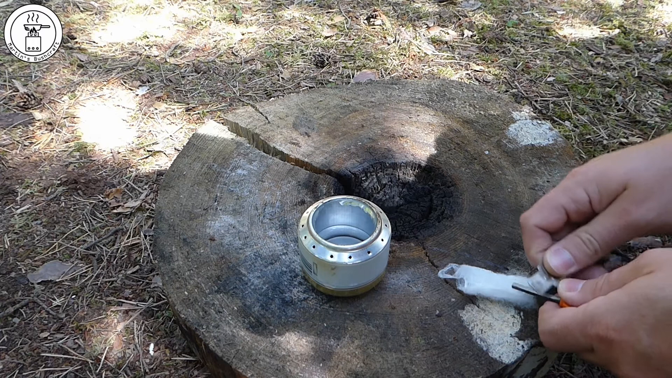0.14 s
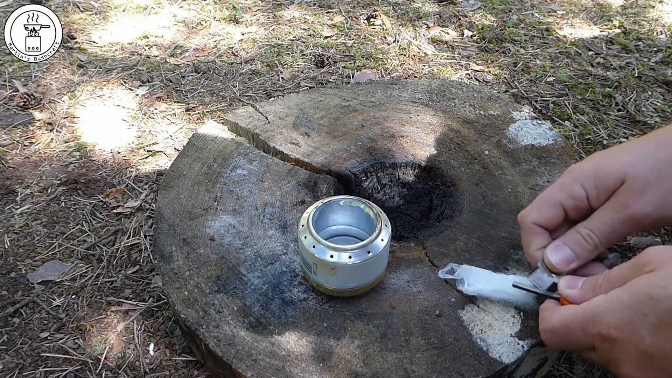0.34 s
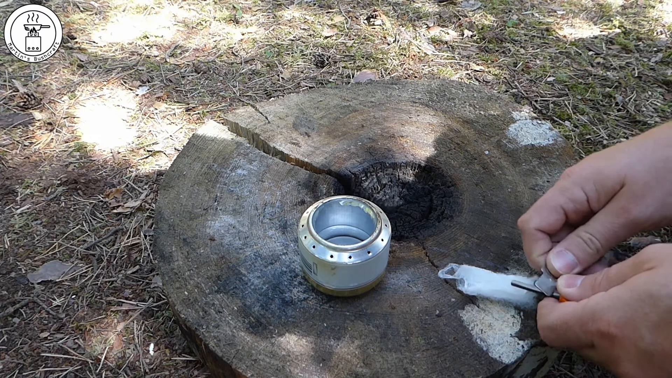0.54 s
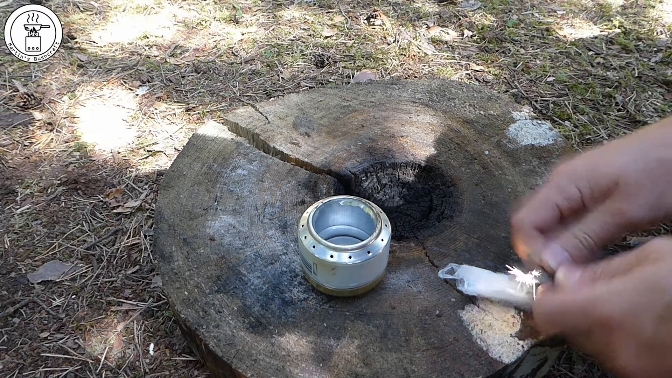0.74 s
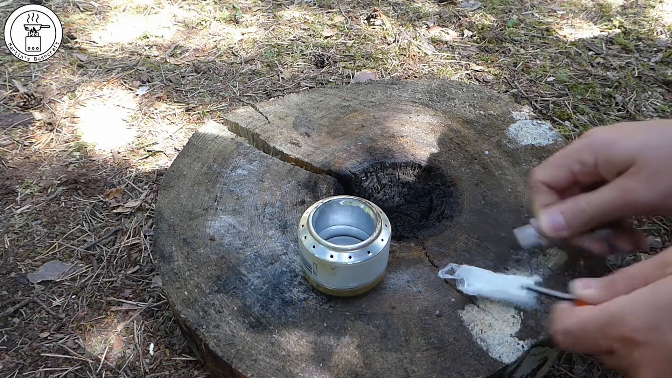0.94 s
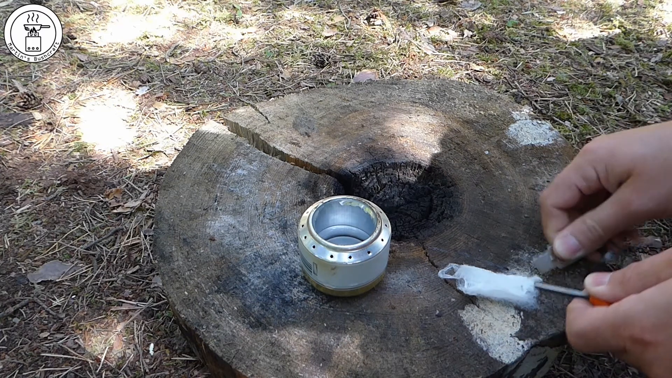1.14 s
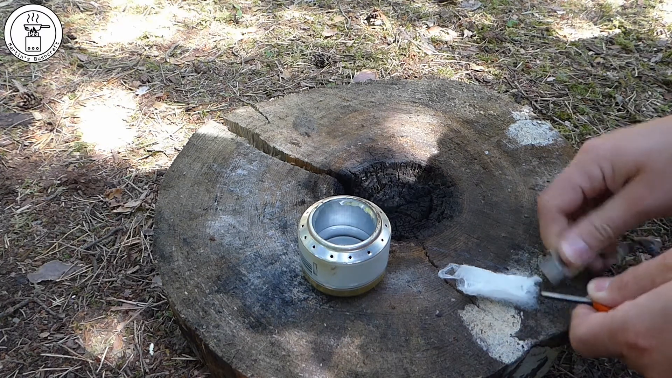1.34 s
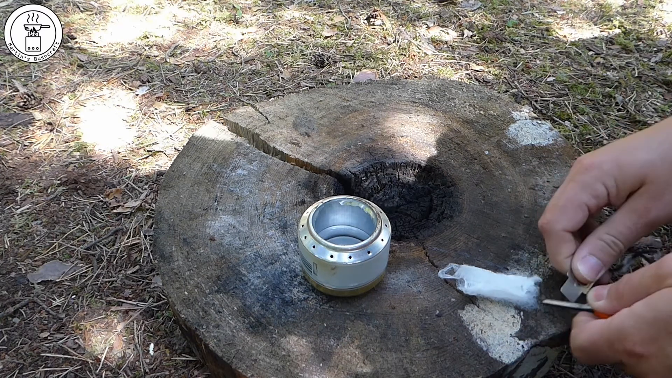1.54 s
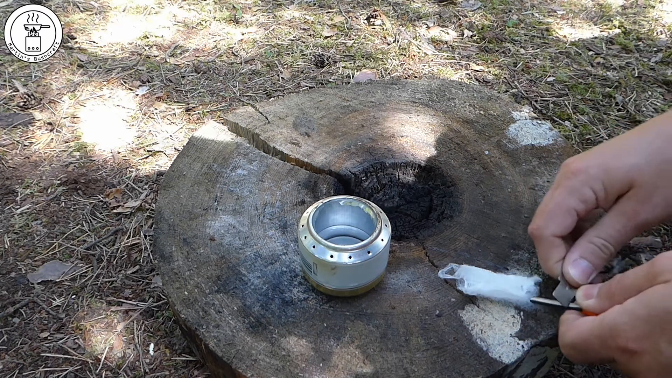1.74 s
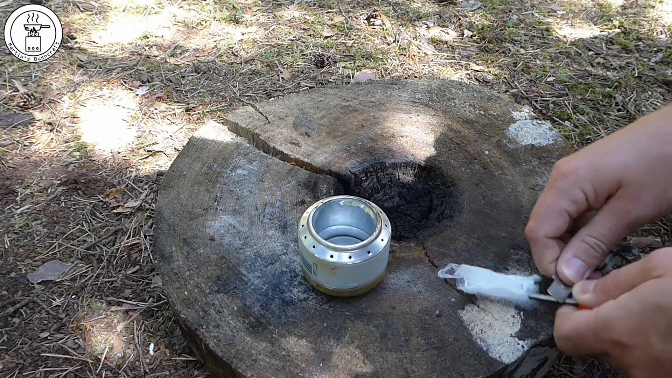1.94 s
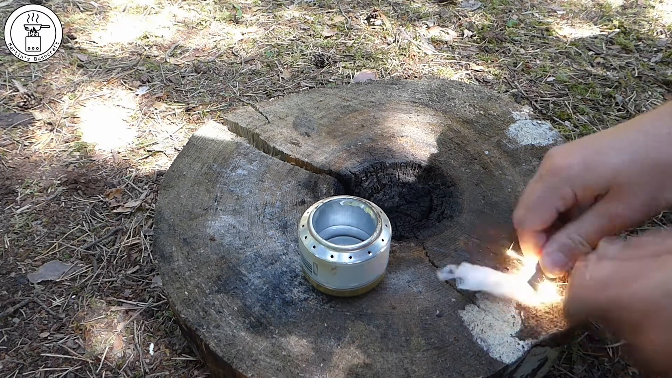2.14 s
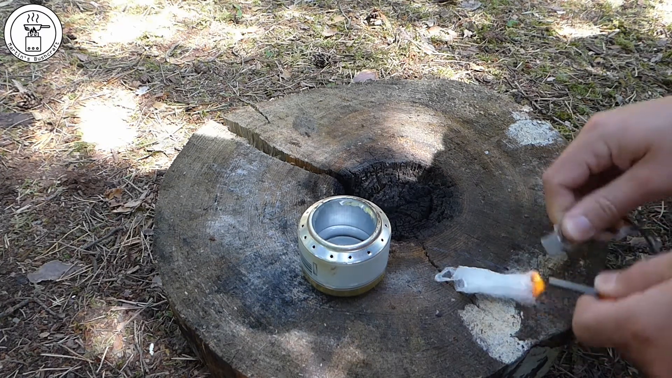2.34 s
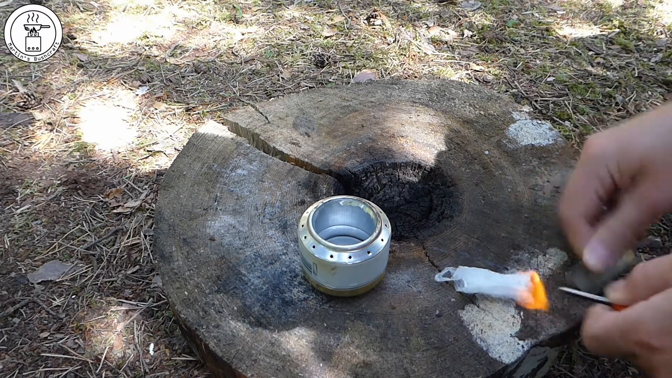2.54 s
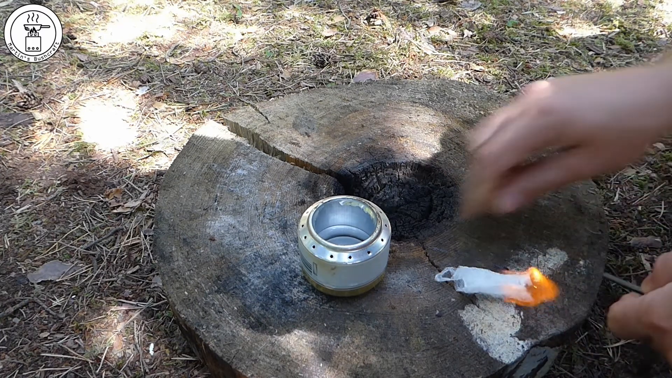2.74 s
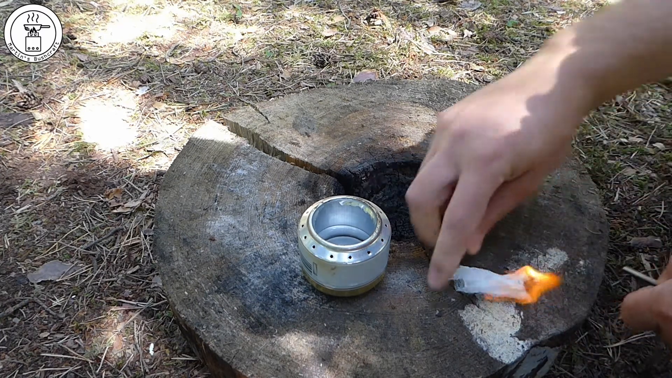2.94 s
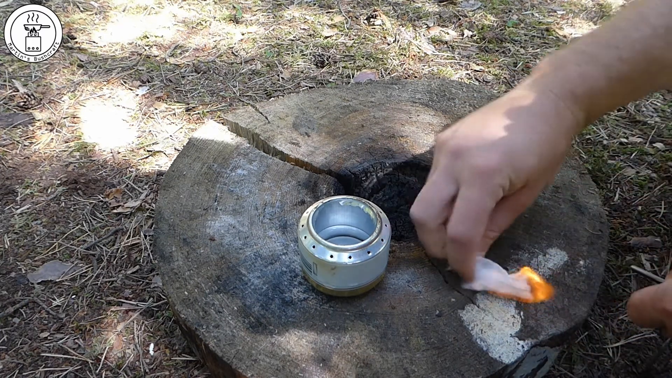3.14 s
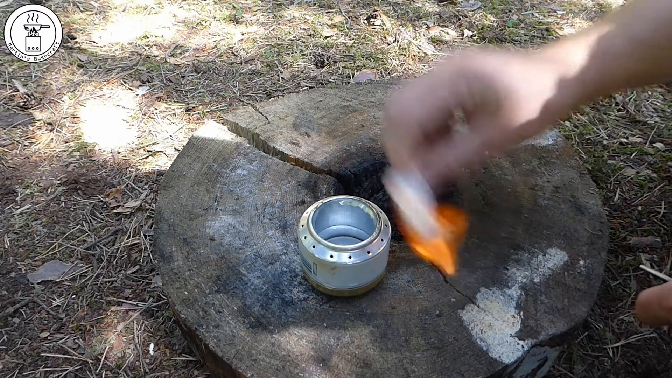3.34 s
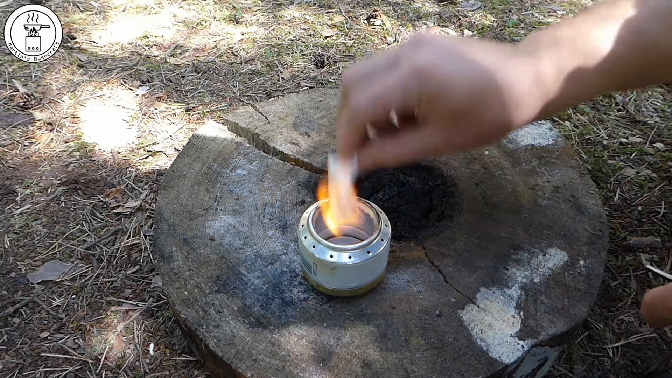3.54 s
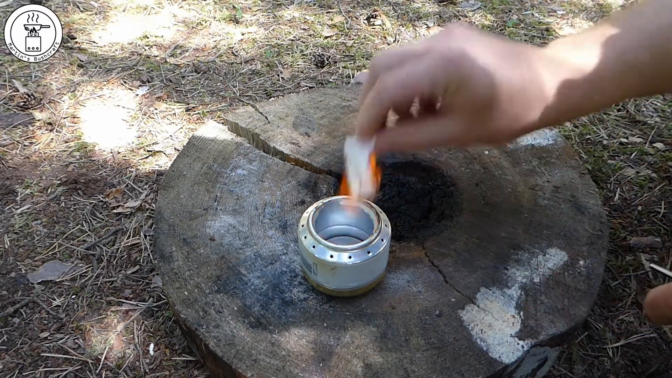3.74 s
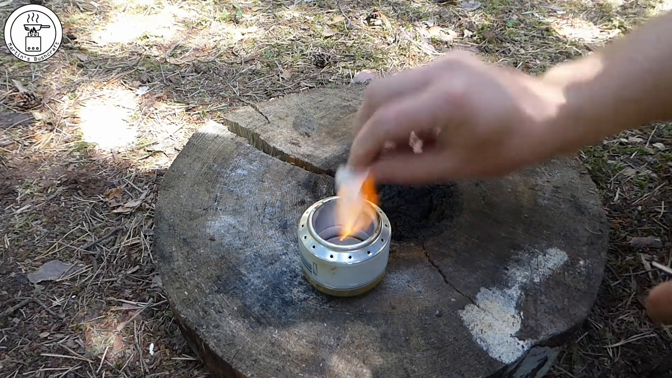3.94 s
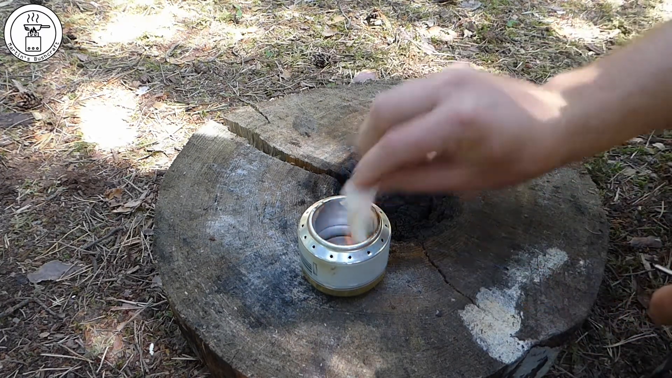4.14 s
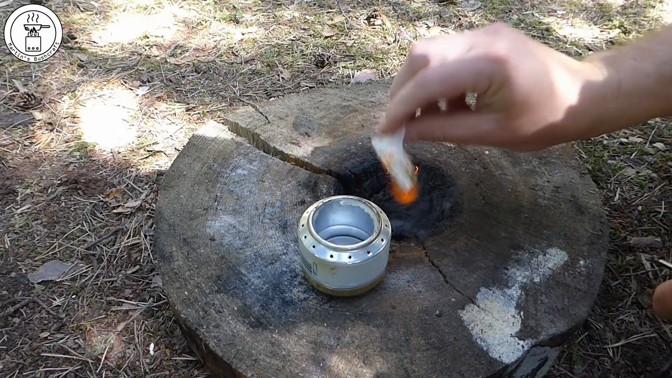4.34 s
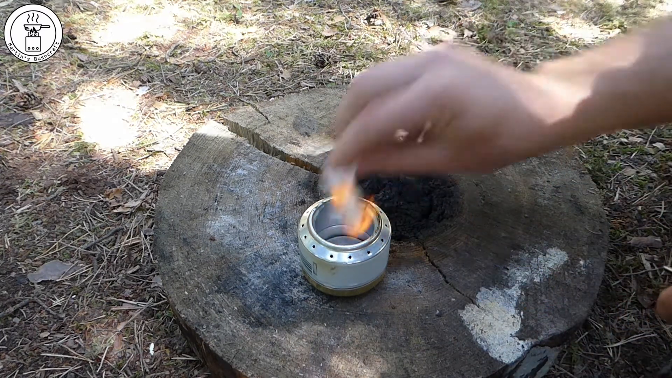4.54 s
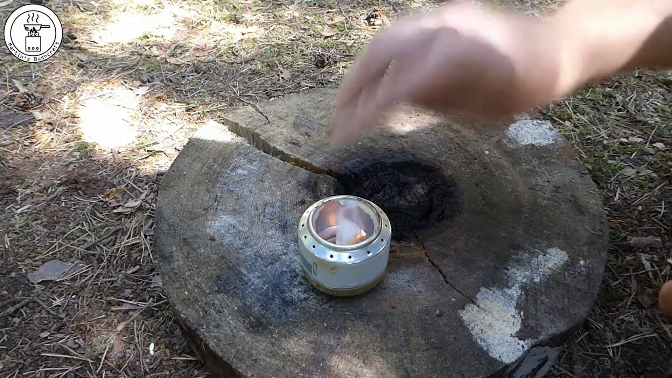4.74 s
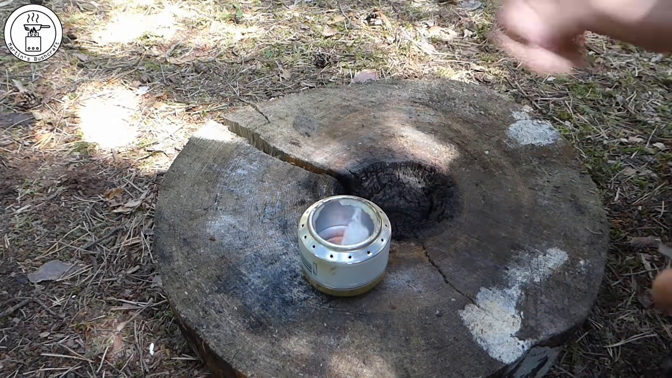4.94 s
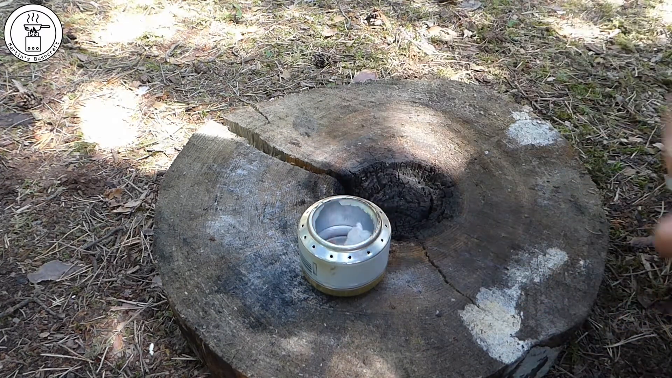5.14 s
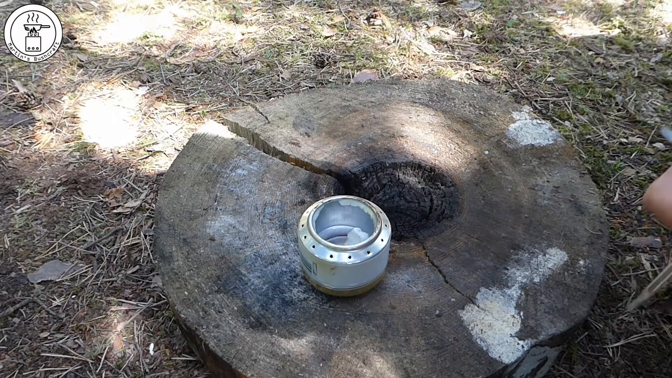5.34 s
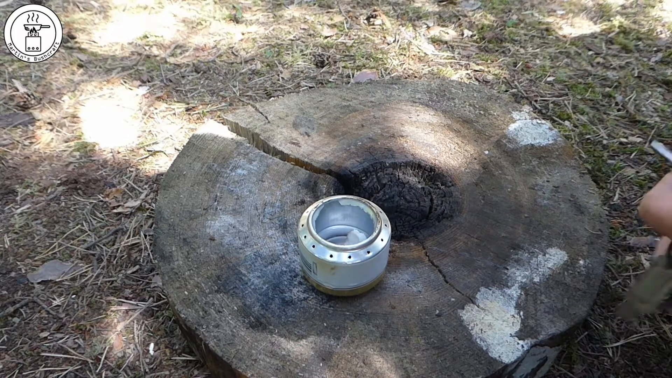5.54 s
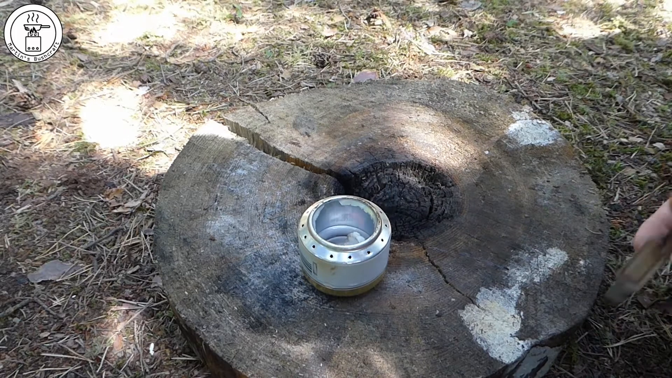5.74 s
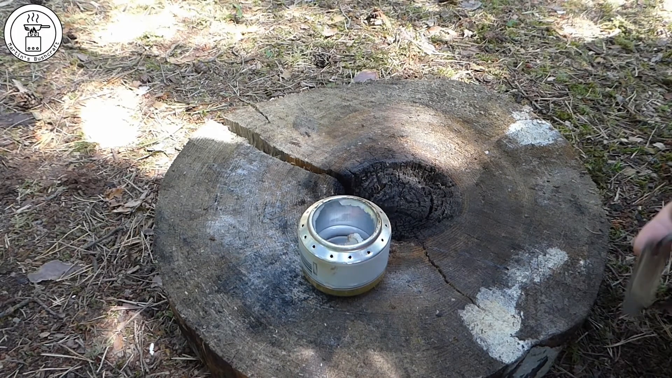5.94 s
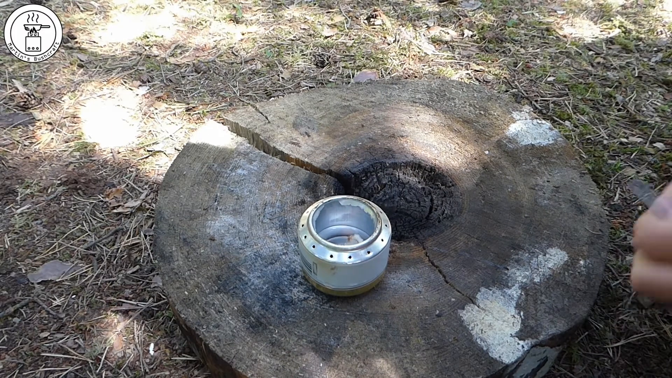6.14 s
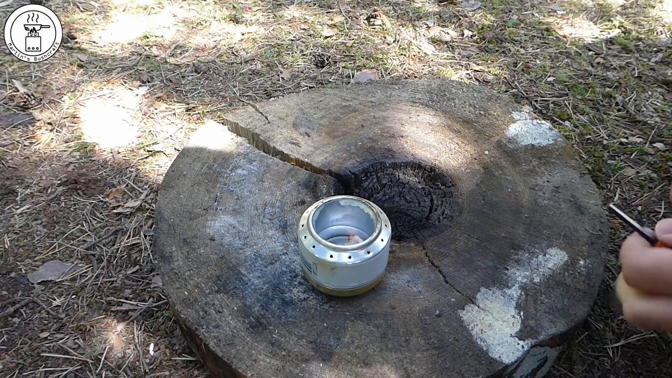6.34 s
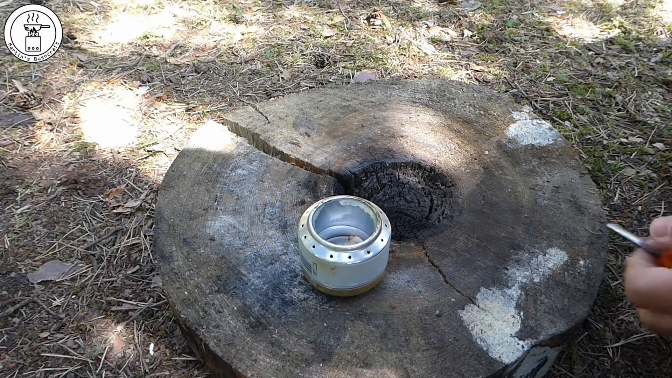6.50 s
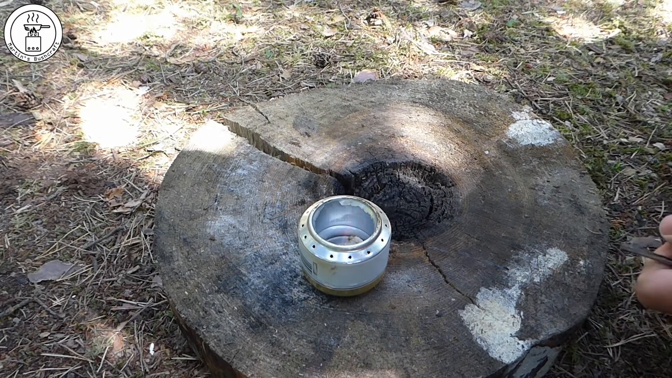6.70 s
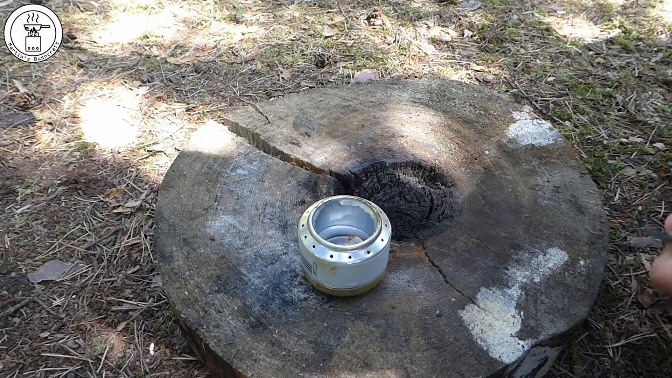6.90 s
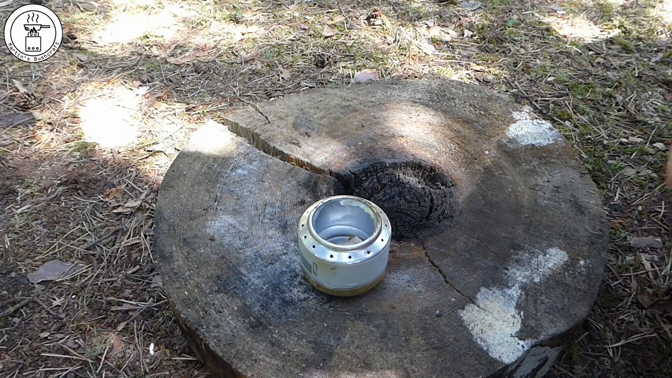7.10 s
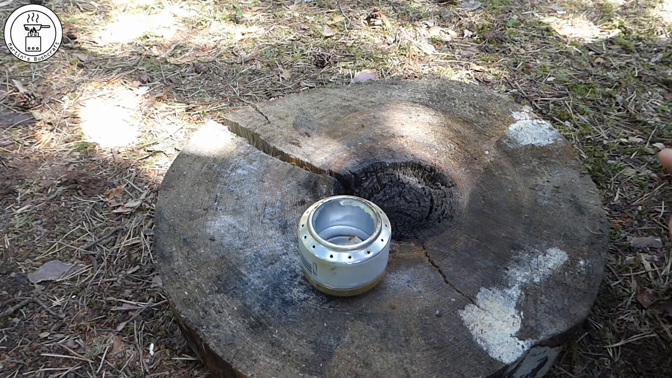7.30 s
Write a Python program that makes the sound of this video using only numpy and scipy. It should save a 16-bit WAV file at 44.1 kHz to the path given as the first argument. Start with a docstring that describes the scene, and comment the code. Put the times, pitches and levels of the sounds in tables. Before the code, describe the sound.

A fire steel is struck twice outdoors, the scraper drops on wood, and a small stove lights with a pop and brief sizzle.

```python
"""Lighting a spirit stove with a fire steel

A steel scraper tears twice down a ferrocerium rod, shaking the tree stump below; sparks fizz and light
a wad of tinder. The scraper drops on the wood and rings, and hands rustle the wad over to a small spirit
stove. The vapour catches with a pop, sizzles, and settles into a fading hollow hiss. Small clinks, a
squeak and a bump follow. Light wind murmurs in the trees throughout."""
import sys
import numpy as np
from scipy import signal
from scipy.fft import rfft, irfft, next_fast_len
from scipy.io import wavfile
from scipy.ndimage import uniform_filter1d, map_coordinates

SR = 44100
rng = np.random.default_rng(int(sys.argv[2]) if len(sys.argv) > 2 else 0)


def pcm_store(signal):
    """Save signal as 16-bit PCM."""
    levels = np.round(np.clip(np.atleast_2d(signal), -1, 1) * 32767)
    wavfile.write(sys.argv[1], SR, levels.astype(np.int16).T)


N = 324742

# strokes down the rod: start_s, release_s, release_level_db, body_gain_db, spark_level_db
ROD_STROKES = [(0.806, 0.8364, -25, -3.5, -61), (2.145, 2.193, -24.5, -9.5, -56.5)]
# the edge grazes the rod as it first catches or on the rebound: start_s, level_db
ROD_GRAZES = [(.8125, -31.5), (2.233, -34), (2.248, -35)]
# bright metal friction: freq_hz, level_db
SCRAPE_SPECTRUM = [(100, -27.5), (500, -6), (1200, -21.5), (1700, -10.5), (2500, -8.5), (4000, -6),
                   (5500, -9), (6400, -3), (8000, -9), (10400, 2), (12500, -0.5), (14000, -19),
                   (15500, -29)]
# resonances of rod and edge: centre_hz, width_hz, lift_db
ROD_RESONANCES = [(2550, 280, 6), (6380, 700, 3.5), (10000, 1470, 0.5)]
# the shudder of rod and stump: freq_hz, level_db
SHUDDER_SPECTRUM = [(40, -36), (70, -25), (140, -5.5), (230, -3.5), (360, 1), (520, -5), (900, -7),
                    (1500, -12), (4000, -49)]
# the edge snaps off the rod or taps it: start_s, ring_db, focus_hz, falloff_db_per_octave, crack_db
EDGE_SNAPS = [(0.4794, -33.5, 7000, 9, -45), (0.8368, -2, 8800, 8.5, -15),
              (0.8379, -10.5, 10400, 11.5, -20), (1.708, -16.5, 5000, 32, -41.5),
              (2.19, -4.5, 12360, 7.5, -13), (2.3696, -36, 4500, 13, -37)]
# modes of rod and edge, damped by the fingers: pitch_hz, level_db, t60_s
HELD_MODES = [(2560, 1, .007), (3130, 0.5, 0.0043), (4200, -7.5, 0.0068), (5850, -5.5, .005),
              (6850, -5.5, .006), (9450, 2, 0.0046), (10320, -2.5, 0.0065), (12320, -5, 0.0051)]
# the scraper lands, and later clinks as it is picked up: start_s, ring_db, knock_db, tilt_db_per_octave
SCRAPER_HITS = [(2.63, -47, -37.5, -3), (2.6593, -41, -37.5, 2.5), (2.673, -49.5, -62.5, -.5),
                (2.772, -68, -47, 5), (5.79, -81, -74, 1), (5.95, -81, -74, 4), (6.02, -79, -68, 6),
                (6.275, -73, -76, 1), (6.315, -73, -80, 2)]
# modes of the loose scraper: pitch_hz, level_db, t60_s
SCRAPER_MODES = [(812, 0.5, 0.12), (1766, -0.5, 0.1), (4406, -11, 0.41), (4420, -7, 0.43), (8450, -21, .3),
                 (10220, -6, 0.33), (12900, 10, 0.078), (12905, -11.5, 0.4), (14300, -27, .25)]
# a knock on the stump: freq_hz, level_db
KNOCK_SPECTRUM = [(40, -35), (120, 3), (300, -2), (800, 6), (1500, -7.5), (3000, -13), (7000, -19),
                  (15000, -21)]
# the vapour catches: start_s, level_db
VAPOUR_PUFFS = [(4.7437, -29), (4.7484, -17.5)]
# damped air modes of the pop: pitch_hz, level_db, t60_s
POP_MODES = [(215, -7, 0.018), (364, -3, 0.016), (706, -2, 0.0086), (1950, -12.5, 0.0093)]
# spirit sizzling on the hot wad: freq_hz, level_db
SIZZLE_SPECTRUM = [(710, -43), (1200, 0), (1470, -7), (1800, -1), (1960, 1), (2740, 0.5), (4720, -11),
                   (6730, 1.5), (8330, -3.5), (10800, 4), (12400, -1), (14900, -21), (15500, -30.5)]
# resonances of the burning stove: centre_hz, width_hz, level_db
JET_RESONANCES = [(2395, 490, -1.5), (3644, 1700, -2.5), (6700, 720, -2), (10600, 1300, -10.5)]
# the settling flame spits: peak_s, level_db
FLAME_SPITS = [(5.645, -56.5), (5.86, -63.5), (5.925, -61.5), (6.25, -63.5)]
# fizzing tinder fibres: freq_hz, level_db
FIZZ_SPECTRUM = [(880, -32), (1500, -4), (1840, -3.5), (2020, -3), (2730, -8), (3000, -3.5), (4210, -3.5),
                 (5510, -9.5), (10700, -4.5), (15000, -22)]
# hands and wad rustle, rising and falling by 20 dB: peak_s, level_db, rise_s, fall_s
HAND_RUSTLES = [(2.79, -54.5, 0.33, 0.2), (3.03, -63, 0.089, .1), (3.15, -62, .06, 0.074),
                (3.36, -58.5, 0.3, 0.17), (3.52, -63, 0.14, 0.16), (7.34, -57.5, 0.28, .3)]
# soft bumps of hand and tool: start_s, level_db, pitch_hz, t60_s
HAND_BUMPS = [(2.7748, -39, 245, 0.037), (6.793, -32, 242, 0.022)]
# the glide of the squeak: time_s, pitch_hz
SQUEAK_GLIDE = [(6.59, 8650), (6.68, 9450), (6.72, 9350), (6.76, 9700), (6.82, 8450)]
# the rasp in the squeak: freq_hz, level_db
RASP_SPECTRUM = [(800, -25), (2000, 1), (3500, -4.5), (6000, -8), (8000, -16), (15000, -38.5)]
# wind in distant trees: freq_hz, level_db
TREE_SPECTRUM = [(15, -72.5), (25, -32), (59, -23.5), (72, -15), (95, -5), (188, 0), (238, -6), (303, -5.5),
                 (384, -4.5), (479, -7.5), (771, -5.5), (1030, -11), (1200, -13), (1580, -19.5),
                 (2000, -29), (2600, -53), (4400, -120)]
# faint airy hiss: freq_hz, level_db
AIR_SPECTRUM = [(1180, -34), (2000, -0.5), (2140, -3.5), (2370, -5), (2630, -5), (3260, -2.5), (4180, -3.5),
                (4590, -2.5), (5740, -10), (6250, -3), (7680, -10), (10100, -5.5), (11400, -7),
                (14700, -18), (15500, -28)]
# how alike the wind is left and right, negatives counting as zero: freq_hz, likeness
STEREO_LIKENESS = [(60, 0.88), (120, 1), (240, 0.93), (480, 0.76), (950, 0.4), (1890, -1.34), (3770, 0.21),
                   (7520, 0.36), (15000, 0.39)]
# the tail from ground and trunks: freq_hz, t60_s
WOODS_DECAY = [(200, .25), (2000, .3), (10000, 0.22)]

GATHER_DB, SHUDDER_DB_PER_S = 18, 296.5  # a stroke builds; the stump shakes more as the hand bears down
FOLLOW_DB, FOLLOW_HOLD_S, FOLLOW_T60_S = -6, .0081, .04  # the follow-through after the release
GRAZE_HOLD_S, GRAZE_T60_S, GRAZE_BODY_DB = .0023, .018, -8.5
SLIDE_HZ = 8000  # without pressure the edge slides, and is duller above this
CRACK_T60_S, SNAP_ATTACK_S = .008, .00018
RING_ATTACK_S, KNOCK_T60_S = .0004, .04
REST_S, REST_T60_S = 2.77, .1  # once the scraper lies flat, the wood damps it
TINDER_LIT_S, IGNITION_S, JET_FULL_S, FLARE_S = 2.4, 4.735, 5.063, 5.07
JET_START_RATIO, JET_END_RATIO, JET_SETTLE_S = 1.08, .93, .8  # the stove's resonances sink in pitch
TREES_DB, AIR_DB = -53, -65.5
LOW_CUT_HZ, TOP_HZ = 75, 15600


def scrapes():
    """The edge tears chips off the rod, louder as it gathers speed, then slides off; the wood shakes."""
    t = np.arange(N) / SR
    cutting, sliding, shaking = np.zeros((3, N))
    for start, release, db, body_db, _ in ROD_STROKES:
        length_s = release - start
        to_go_s = np.clip(release - t, 0, length_s)
        cut = amp(db - GATHER_DB * to_go_s / length_s) * swell(start, .002, .0009, hold_s=length_s)
        slide = amp(db + FOLLOW_DB) * fading(release, .0016, 60 / FOLLOW_T60_S, FOLLOW_HOLD_S)
        cutting += cut
        sliding += slide
        shaking += np.maximum(cut, slide) * amp(body_db - SHUDDER_DB_PER_S * to_go_s)
    for start, db in ROD_GRAZES:
        slide = amp(db) * fading(start, .0014, 60 / GRAZE_T60_S, GRAZE_HOLD_S)
        sliding += slide
        shaking += slide * amp(GRAZE_BODY_DB)
    chips = unit(filtered(grains(per_s=35000, spread_db=3.5), rod_colour))
    friction = grains(per_s=35000, spread_db=4.5)
    rub = unit(filtered(friction, lambda hz: rod_colour(hz) / np.hypot(1, (hz / SLIDE_HZ) ** 2)))
    chatter = amp(2.6 * wobble(350))  # the edge grips and slips
    shudder = coloured(rng.standard_normal(N), SHUDDER_SPECTRUM)
    return chatter * (cutting * chips + sliding * rub) + shaking * shudder


def snaps():
    """Hand-held metal rings briefly with a broad crack; the point of contact favours some modes."""
    track, t = np.zeros(N), np.arange(SR // 30) / SR
    crackle = filtered(rng.standard_normal(N), rod_colour)
    attack = 1 - np.exp(-t / SNAP_ATTACK_S)
    for start, ring_db, focus_hz, falloff, crack_db in EDGE_SNAPS:
        ring = sum(mode(t, hz, db - falloff * abs(np.log2(hz / focus_hz)), t60)
                   for hz, db, t60 in HELD_MODES)
        crack = amp(crack_db - 60 * t / CRACK_T60_S) * unit(crackle[round(start * SR):][:len(t)])
        add(track, start, (amp(ring_db) * ring + crack) * attack)
    return track


def rod_colour(hz):
    """The tone of metal friction, lifted at the resonances of rod and edge."""
    lift_db = sum(db / (1 + (2 * (hz - centre) / width) ** 2) for centre, width, db in ROD_RESONANCES)
    return amp(along(SCRAPE_SPECTRUM, hz) + lift_db)


def vapour_pop():
    """The vapour catches in two quick puffs that swing the air for a few cycles."""
    track, t = np.zeros(N), np.arange(SR // 10) / SR
    swing = sum(mode(t, hz, db, t60) for hz, db, t60 in POP_MODES)
    for start, db in VAPOUR_PUFFS:
        add(track, start, amp(db) * swing)
    return track


def stove():
    """Spirit sizzles on the hot wad, which flares once; the cup settles into a hollow, spitting hiss."""
    age_s = np.maximum(np.arange(N) / SR - IGNITION_S, 0)
    flash = amp(-46) * fading(IGNITION_S, rise_s=.02, db_per_s=85, hold_s=.062)
    simmer = amp(-52.5) * fading(IGNITION_S, rise_s=.02, db_per_s=14.5)
    sizzle = np.hypot(flash, simmer) * coloured(grains(per_s=30000, spread_db=.5), SIZZLE_SPECTRUM)
    fizz = coloured(grains(per_s=49000, spread_db=0), FIZZ_SPECTRUM)
    flare = amp(-49.5) * swell(FLARE_S, rise_s=.17, fall_s=.14) * fizz
    burn = amp(-59.5) * fading(JET_FULL_S, rise_s=.6, db_per_s=29, hold_s=.32) * (age_s > 0)
    spits = [amp(db) * swell(peak, rise_s=.029, fall_s=.033) for peak, db in FLAME_SPITS]
    sink = JET_END_RATIO + (JET_START_RATIO - JET_END_RATIO) * np.exp(-age_s / JET_SETTLE_S)
    hollow = sum(amp(db) * band(hz * sink, width) for hz, width, db in JET_RESONANCES)
    jet = np.linalg.norm([burn, *spits], axis=0) * hollow
    flutter = amp(1.06 * wobble(35))
    return flutter * (sizzle + flare + jet)


def dropped_scraper():
    """Each bounce knocks the wood and rings the little steel plate; it rests, then clinks when lifted."""
    track, t = np.zeros(N), np.arange(SR // 2) / SR
    wood = coloured(rng.standard_normal(N), KNOCK_SPECTRUM)
    attack = 1 - np.exp(-t / RING_ATTACK_S)
    for start, ring_db, knock_db, tilt in SCRAPER_HITS:
        ring = np.zeros_like(t)
        for hz, db, t60 in SCRAPER_MODES:
            struck_db = db + tilt * np.log2(hz / 4000) + rng.normal(0, 1.2)
            ring += mode(t, hz, struck_db, t60, phase_turns=rng.random())
        resting_s = np.maximum(start + t - REST_S, 0) * (start < REST_S)
        ring *= amp(ring_db - 60 * resting_s / REST_T60_S)
        knock = amp(knock_db - 60 * t / KNOCK_T60_S) * wood[round(start * SR):][:len(t)]
        add(track, start, ring * attack + knock)
    return track


def bumps():
    """Hand and tool bump softly, each a low, quickly damped thud."""
    track, t = np.zeros(N), np.arange(SR // 10) / SR
    for start, db, hz, t60 in HAND_BUMPS:
        add(track, start, mode(t, hz, db, t60))
    return track


def tinder():
    """Each stroke leaves sparks fizzing in the fibres, the second lights a flame, and hands rustle."""
    sparks = [amp(db) * fading(release, rise_s=.021, db_per_s=42) for _, release, _, _, db in ROD_STROKES]
    flame = amp(-63.5) * fading(TINDER_LIT_S, rise_s=.44, db_per_s=8)
    rustles = [amp(db) * swell(peak, rise, fall) for peak, db, rise, fall in HAND_RUSTLES]
    level = np.linalg.norm([flame, *sparks, *rustles], axis=0)
    flicker = amp(wobble(40))
    return level * flicker * coloured(grains(per_s=5000, spread_db=-1.5), FIZZ_SPECTRUM)


def squeak():
    """Something rubs in the hand: a thin gliding squeak over a fine stick-slip rasp."""
    glide_hz = np.interp(np.arange(N) / SR, *np.transpose(SQUEAK_GLIDE))
    pitch_hz = glide_hz * (1 + .005 * wobble(300))
    tone = np.sin(2 * np.pi * np.cumsum(pitch_hz) / SR)
    slip_hz = 75 * np.exp(.12 * wobble(30))
    slip_phase = np.cumsum(slip_hz) / SR % 1
    rasp = unit(np.exp(-slip_phase / .37) * coloured(rng.standard_normal(N), RASP_SPECTRUM))
    return amp(-68) * swell(6.66, rise_s=.26, fall_s=.04, hold_s=.12) * (tone + amp(2.5) * rasp)


def wind():
    """A low murmur of distant trees under a faint even hiss."""
    murmur = amp(TREES_DB + .36 * wobble(5.8)) * rush(TREE_SPECTRUM, patchy_db=1)
    return murmur + amp(AIR_DB) * rush(AIR_SPECTRUM, patchy_db=2.6)


def rush(spectrum, patchy_db):
    """A wide bed of noise, with patches of random gain across pitch and time."""
    def mid_side_gains(hz):
        likeness = np.clip(along(STEREO_LIKENESS, hz), 0, 1)
        width = np.tan(np.arccos(likeness) / 2)
        return amp(along(spectrum, hz)) * np.array([np.ones_like(hz), width])
    bins = signal.stft(rng.standard_normal((2, N)), nperseg=1024)[2]
    patches = uniform_filter1d(rng.standard_normal(bins.shape[1:]), size=6, axis=0)
    patches = uniform_filter1d(patches, size=10, axis=1)
    pair = signal.istft(bins * amp(patchy_db * unit(patches)), nperseg=1024)[1][:, :N]
    mid, side = filtered(pair, mid_side_gains)
    return np.array([mid + side, mid - side]) / mid.std()


def woods(x):
    """Ground and trunks scatter a short stereo tail."""
    hz, t, bins = signal.stft(rng.standard_normal((2, SR // 2)), SR, nperseg=256)
    decay = amp(-60 * t / along(WOODS_DECAY, hz)[:, None])
    tail = signal.istft(bins * decay, SR, nperseg=256)[1]
    return signal.fftconvolve(x[None], tail / np.linalg.norm(tail[0]), axes=1)[:, :N]


def placed(x, right_db):
    """Pan a near source: the recorder's body shades the left microphone, but only above the bass."""
    def shade(hz):
        gains = amp(np.outer([-1, 1], right_db / 2 * hz ** 2 / (hz ** 2 + 800 ** 2)))
        return gains / gains.mean(axis=0)
    return filtered(x, shade)


def mode(t, hz, db, t60_s, phase_turns=0):
    """One ringing partial that dies by 60 dB in t60_s."""
    return amp(db - 60 * t / t60_s) * np.sin(2 * np.pi * (hz * t + phase_turns))


def band(hz, width_hz):
    """Noise in one resonance whose centre may move."""
    baseband = filtered(rng.standard_normal((2, N)), lambda f: 1 / np.sqrt(1 + (2 * f / width_hz) ** 4))
    phase = 2 * np.pi * np.cumsum(hz) / SR
    return unit(baseband[0] * np.cos(phase) + baseband[1] * np.sin(phase))


def grains(per_s, spread_db):
    """A dense train of tiny clicks of uneven size, at most one a sample."""
    clicks = (rng.random(N) < per_s / SR) * rng.standard_normal(N)
    return unit(clicks * amp(spread_db * rng.standard_normal(N)))


def swell(peak_s, rise_s, fall_s, hold_s=0):
    """An envelope that climbs 20 dB per rise_s, holds at 1 from peak_s, then drops 20 dB per fall_s."""
    t = np.arange(N) / SR - peak_s
    decades_down = np.maximum(-t / rise_s, 0) + np.maximum((t - hold_s) / fall_s, 0)
    return amp(-20 * np.minimum(decades_down, 10))


def fading(peak_s, rise_s, db_per_s, hold_s=0):
    """A swell that dies at a given speed."""
    return swell(peak_s, rise_s, 20 / db_per_s, hold_s)


def wobble(rate_hz):
    """A smooth random drift through rate_hz knots a second."""
    knots = rng.standard_normal(int(N * rate_hz / SR) + 4)
    return map_coordinates(knots, [np.arange(N) * rate_hz / SR])


def coloured(x, spectrum):
    """Shape x with an EQ curve, at rms 1."""
    return unit(filtered(x, lambda hz: amp(along(spectrum, hz))))


def filtered(x, response):
    """Filter x by a gain that depends on frequency."""
    size = next_fast_len(N + SR // 8, real=True)
    return irfft(rfft(x, size) * response(np.fft.rfftfreq(size, 1 / SR)), size)[..., :N]


def low_cut(x, hz, order):
    """Roll off the deep bass, like a microphone's low-cut filter."""
    return signal.sosfilt(signal.butter(order, hz, 'highpass', fs=SR, output='sos'), x)


def along(points, hz):
    """Read a curve on a log frequency axis."""
    freqs, values = np.transpose(points)
    return np.interp(np.log(hz + 1), np.log(freqs + 1), values)


def add(track, start_s, sound):
    """Mix a sound into the track."""
    part = track[round(start_s * SR):][:len(sound)]
    part += sound[:len(part)]


def amp(db):
    """Decibels to gain."""
    return 10 ** (np.asarray(db) / 20)


def unit(x):
    """Scale to rms 1."""
    return x / np.sqrt(np.mean(x ** 2) + 1e-20)


def scene():
    """The hands work on the right, the stove stands nearer the middle, and the woods lie all around."""
    striker = scrapes() + snaps()
    handling = dropped_scraper() + tinder() + squeak()
    burner = stove()
    thumps = low_cut(vapour_pop() + bumps(), hz=120, order=3)
    near = placed(striker, right_db=7) + placed(handling, right_db=8)
    near += placed(burner, right_db=4) + placed(thumps, right_db=3)
    reverb_send = amp(-25) * (striker + handling + thumps) + amp(-6.5) * burner
    return low_cut(near, LOW_CUT_HZ, order=2) + woods(reverb_send) + wind()


def record(dry):
    """Flatten peaks at full scale and cut everything above the band limit."""
    return filtered(np.clip(dry, -1, 1), lambda hz: hz < TOP_HZ)


dry = scene()
out = record(dry)
pcm_store(out)
```